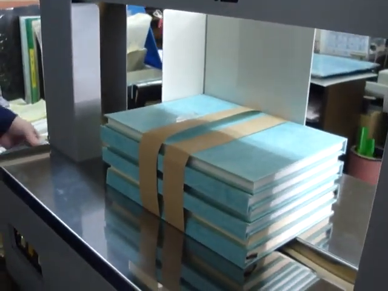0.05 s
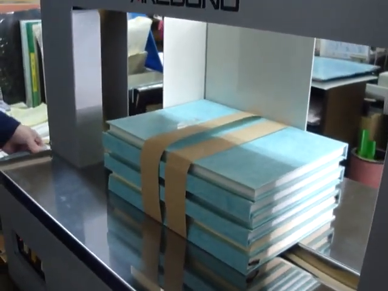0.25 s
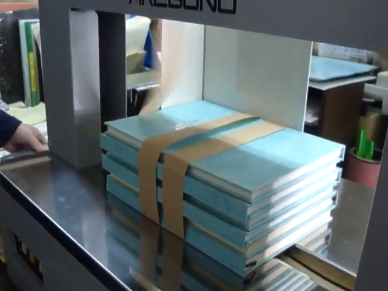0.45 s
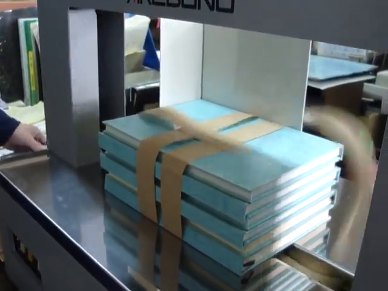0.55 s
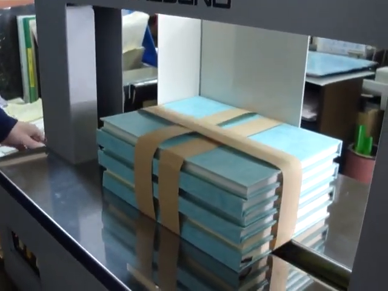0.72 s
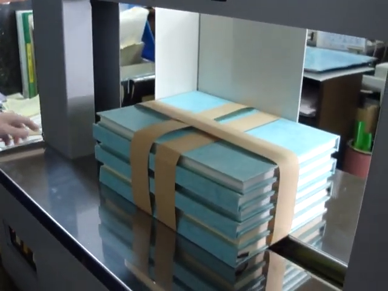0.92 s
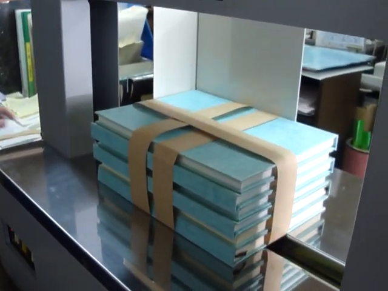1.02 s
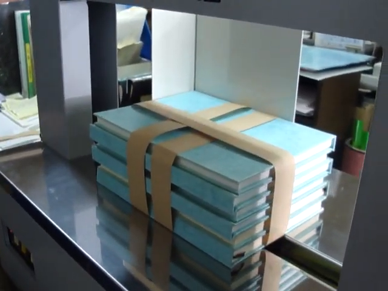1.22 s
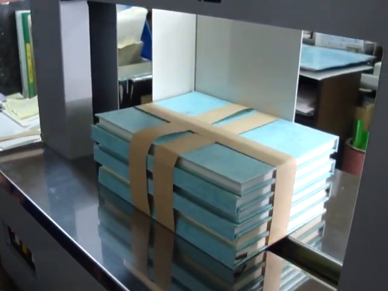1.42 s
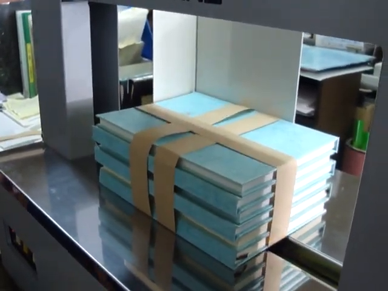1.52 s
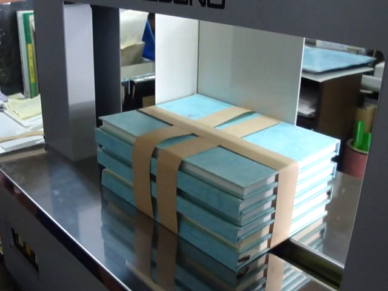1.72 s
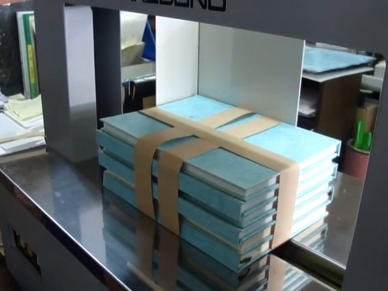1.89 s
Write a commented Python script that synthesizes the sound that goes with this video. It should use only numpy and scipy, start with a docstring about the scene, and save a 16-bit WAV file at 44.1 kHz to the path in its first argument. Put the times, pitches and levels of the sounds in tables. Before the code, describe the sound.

A banding machine runs one cycle in a workshop: low knocks, then paper tape hissing and snapping tight around a stack. After a pause come whirring and sharp steel clacks, heard close over a faint fan and hum.

```python
"""Low knocks, a rush of snaps and hiss, a pause, then whirring and steel clacks over a fan and hum.
A paper banding machine runs one cycle in a workshop. A clamp grips the paper tape and rollers
whip it tight round a stack; then the drive shifts the sealing plate and cutter, and lever blows
ring the steel frame, plate and pawl."""
import sys
import numpy as np
from scipy import signal
from scipy.fft import rfft, irfft
from scipy.io import wavfile

SR = 44100
rng = np.random.default_rng(int(sys.argv[2]) if len(sys.argv) > 2 else 0)


def generate_wav(sig):
    """Save sig (samples, or channels by samples) to the path in sys.argv[1] as 16-bit PCM at SR."""
    pcm = np.round(np.clip(np.atleast_2d(sig).T, -1, 1) * 32767).astype(np.int16)
    wavfile.write(sys.argv[1], SR, pcm)


N = 85995
EDGE_HZ = 11080  # upper band limit
# paper tape spectrum: f/Hz, level/dB
PAPER_SPECTRUM = [(60, -49), (250, -24), (600, -4.5), (1200, -2.5), (2000, -2), (2800, 1), (3700, 4.5),
                  (4500, 3), (5500, 4.5), (6400, 2), (7400, 3.5), (8500, -2), (11000, -6)]


def amp(db):
    """Decibels to gain."""
    return 10 ** (np.asarray(db) / 20)


def unit(x):
    """Scale to rms 1."""
    return x / np.sqrt(np.mean(x ** 2) + 1e-20)


def at_hz(points, hz):
    """Interpolate a table over log frequency."""
    f, value = np.transpose(points)
    return np.interp(np.log(hz + 1), np.log(f + 1), value)


def bump(hz, centre_hz, width_oct):
    """Bell of height 1 over log frequency."""
    return np.exp(-(np.log2((hz + 1) / centre_hz) / width_oct) ** 2)


def gain_curve(points, column=1):
    """Timed dB points to a gain per sample."""
    points = np.array(points)
    return amp(np.interp(np.arange(N) / SR, points[:, 0], points[:, column]))


def add(mix, start_s, sound):
    """Mix a sound in at start_s."""
    part = mix[round(start_s * SR):][:len(sound)]
    part += sound[:len(part)]


def colour(x, shape_db):
    """Filter by a dB function of frequency; rms 1."""
    hz = np.fft.rfftfreq(len(x), 1 / SR)
    return unit(irfft(rfft(x) * amp(shape_db(hz)) * (hz < EDGE_HZ), len(x)))


def drift(rate_hz):
    """Slow random drift, rms 1."""
    return colour(rng.standard_normal(N), lambda hz: -10 * np.log10(1 + (hz / rate_hz) ** 4))


def grains(clicks_per_s=2500, spread_db=2, click_share=0.57):
    """Dense uneven clicks over smooth noise."""
    size = amp(spread_db * np.minimum(rng.exponential(1, N), 4))
    clicks = size * rng.choice([-1, 1], N) * (rng.random(N) < clicks_per_s / SR)
    return np.sqrt(click_share) * unit(clicks) + np.sqrt(1 - click_share) * rng.standard_normal(N)


def burst(envelope, shape_db, size=2048):
    """A flurry of tiny impacts rings a body with the given spectrum."""
    hz = abs(np.fft.fftfreq(size, 1 / SR))
    log_gain = np.log(amp(shape_db(hz)) / (1 + (hz / EDGE_HZ) ** 40) + 1e-4)
    body = np.fft.ifft(np.exp(np.conj(signal.hilbert(log_gain)))).real[:size // 2]  # minimum phase
    impacts = envelope * rng.standard_normal(len(envelope))
    for _ in range(2):
        whitened = irfft(np.exp(1j * np.angle(rfft(impacts))), len(envelope))
        impacts = envelope * np.sign(whitened)
    return signal.fftconvolve(impacts, body / np.linalg.norm(body))[:len(envelope)]


def ring(modes, t):
    """Decaying modes of a steel part, normalised by their summed power."""
    power = sum(amp(db) ** 2 for _, db, _ in modes) / 2
    return sum(amp(db) * np.exp(-np.log(1000) * t / t60_s) * np.sin(2 * np.pi * hz * t)
               for hz, db, t60_s in modes) / np.sqrt(power)


def room(x, early_db=-9, tail_db=-14.5):
    """Early reflections off the steel table and arch, then the workshop's tail."""
    # reverberation: f/Hz, t60/s
    decay_times = [(100, 0.13), (500, 0.77), (2000, 0.83), (5000, 0.54), (8000, 0.23), (11000, 0.27)]
    t = np.arange(SR) / SR
    early = rng.standard_normal(SR) * (rng.random(SR) < 1500 / SR)
    early *= (t > 0.002) * np.exp(-t / 0.0082)
    hz, frame_s, bands = signal.stft(rng.standard_normal(SR), SR, nperseg=256)
    bands *= np.exp(-np.log(1000) * frame_s / at_hz(decay_times, hz)[:, None])
    tail = signal.istft(bands, SR, nperseg=256)[1][:SR] * np.minimum(t / 0.029, 1)
    echo = amp(early_db) * early / np.linalg.norm(early) + amp(tail_db) * tail / np.linalg.norm(tail)
    return signal.fftconvolve(x, echo)[:N]


def fan(flutter_db=0.73):
    """Fan and workshop noise, slightly unsteady."""
    # air noise: f/Hz, level/dB
    spectrum = [(20, -23), (50, -26), (100, -13), (190, -11), (320, -3.5), (450, -9), (590, -3.5),
                (800, -7.5), (1370, -10), (2250, -15.5), (4000, -17), (6200, -18), (9000, -22),
                (11000, -26.5)]
    # swell: t/s, level/dB
    swell = [(0, -62), (.5, -50.5), (1.2, -48), (1.95, -50)]
    air = colour(rng.standard_normal(N), lambda hz: at_hz(spectrum, hz))
    return gain_curve(swell) * air * amp(flutter_db * drift(25))


def hum(wobble=0.00565):
    """Idle hum; each partial wavers in pitch and level."""
    # partials before the swell: f/Hz, level/dB
    partials = [(100, -70.5), (195, -68), (403.7, -57), (590, -56.5), (834, -68.5), (1136, -67),
                (1184, -74.5), (1227, -82.5), (1416, -66.5), (1658, -66.5)]
    # swell: t/s, gain/dB
    swell = [(0, -6), (.7, -0.5), (.95, 3.5), (1.25, 4.5), (1.8, -2.5), (1.95, -1.5)]
    out = np.zeros(N)
    for hz, db in partials:
        phase = 2 * np.pi * np.cumsum(hz * (1 + wobble * drift(14.5))) / SR
        out += amp(db) * unit(np.sin(phase) * (1 + 0.1 * drift(6)))
    return gain_curve(swell) * out


def drive(drone_hz=392, wobble=0.0126, pulse_depth=0.096):
    """Gears rattle in step with the motor while the housing drones."""
    # drive cycle: t/s, rattle/dB, drone/dB
    levels = [(.23, -46, -70), (.26, -37, -82), (.32, -39, -48), (.36, -44, -38), (.38, -22.5, -53),
              (.40, -34, -30), (.45, -31.5, -37.5), (.48, -39.5, -58), (.6, -34.5, -48), (.7, -50, -62),
              (1.0, -50.5, -84), (1.31, -47.5, -70), (1.34, -27, -47), (1.38, -30, -47),
              (1.405, -29.5, -25), (1.44, -32.5, -42.5), (1.455, -26.5, -27.5), (1.477, -25, -19.5),
              (1.495, -35.5, -28), (1.52, -40, -41), (1.56, -34.5, -64), (1.7, -51, -75), (1.8, -72, -68)]
    # gear rattle: f/Hz, level/dB
    gear_spectrum = [(50, -49), (130, -17), (185, 3.5), (270, -5), (450, -0.5), (600, 4.5), (850, 2),
                     (1050, 2.5), (1230, 5), (1600, -4.5), (3200, -11), (6000, -12), (11000, -23.5)]
    phase = 2 * np.pi * np.cumsum(drone_hz * (1 + wobble * drift(40))) / SR
    drone = np.sin(phase) + amp(-22.5) * np.sin(phase / 2) + amp(-17.5) * np.sin(1.5 * phase)
    pulsing = 1 + pulse_depth * np.cos(phase / 2)
    rattle = colour(grains() * pulsing, lambda hz: at_hz(gear_spectrum, hz))
    return gain_curve(levels, column=1) * rattle + gain_curve(levels, column=2) * unit(drone)


def knocks(push_s=0.00014, swing_hz=239, decay_s=0.0068):
    """Each short push sets off a low, damped swing of the table."""
    # knocks at cycle start: t/s, level/dB
    hits = [(.1430, -25), (0.1524, -23.5), (0.1744, -22.5)]
    out, t = np.zeros(N), np.arange(SR // 20) / SR
    push = -np.exp(-((t - push_s) / push_s) ** 2)
    swing = np.cos(2 * np.pi * swing_hz * (t - 0.001)) * np.exp(-t / decay_s) * (t > 2 * push_s)
    for start_s, db in hits:
        add(out, start_s, amp(db) * (push + 0.41 * swing))
    return out


def lever_clacks(ring_rise_s=0.0015, low_cut_db_per_oct=4.5):
    """Each blow cracks above the part's lowest resonance and rings frame, plate and pawl."""
    # lever blows: t/s, crack/dB, lowest resonance/Hz, its lift/dB, attack/s, decay/s,
    # frame/dB, plate/dB, pawl/dB, contact damping/(1/s, sign ignored)
    blows = [(.196, -44, 3100, 11, .001, 0.024, -58, -57, -60, 20),
             (.229, -19, 3100, 7, 0.0011, 0.0044, -41, -45, -40, 60),
             (0.2361, -21.5, 810, 15, 0.0017, .005, -48, -53, -38, 10),
             (0.2461, -21, 1300, 10, 0.0017, 0.0096, -25, -53, -11.5, 45),
             (1.076, -40, 3540, -9, .001, 0.003, -70, -72.5, -70, 20),
             (1.2863, -22.5, 1380, 9.5, 0.0053, 0.01, -19.5, -45, -50, 15),
             (1.331, -15.5, 1190, 8, .003, 0.015, -21.5, -47, -22, 6),
             (1.3402, -20.5, 600, 14, 0.00069, 0.0082, -23.5, -31, -44, 25),
             (1.342, -23.5, 3150, 28, .001, .02, -47, -43, -50, 23),
             (1.3846, -26.5, 4470, 8, 0.0011, 0.016, -48, -48, -45, 20),
             (1.427, -20.5, 4480, 0.5, 0.0037, 0.0065, -32, -58, -28, 13),
             (1.549, -12.5, 1360, 8.5, 0.00034, .007, -22.5, -39, -43, -2),
             (1.5496, -15.5, 2170, 17.5, .0006, 0.011, -50, -51, -57, 5),
             (1.5742, -18.5, 3320, 10.5, 0.00038, 0.0036, -38, -23, -51, 110),
             (1.602, -27.5, 1430, 2, 0.00066, 0.017, -56, -36, -49, 40),
             (1.625, -13.5, 6050, 5, 0.0017, .005, -28.5, -20, -42.5, 8)]
    # crack spectrum: f/Hz, level/dB
    spectrum = [(40, -7), (200, 0.5), (500, 2), (1300, 3.5), (2300, 1.5), (2900, 1), (4200, 1.5),
                (6500, 3.5), (8300, -1), (11000, -9)]
    # steel modes: f/Hz, level/dB, t60/s
    frame_modes = [(1203, 1.5, 0.14), (1279, -8.5, 0.17), (1388, -7.5, 0.21), (1900, -27, .08),
                   (2320, -31, 0.043), (2370, 1, 0.16), (3463, 0.5, .08), (4538, 6, 0.096),
                   (5600, -1, 0.079), (5790, -1.5, 0.23), (6890, -23, 0.07), (8100, -0.5, 0.052),
                   (9210, -6.5, 0.08)]
    plate_modes = [(3060, -2, 0.066), (3530, 7.5, 0.09), (3528, -6, 0.4), (3540, -7.5, 0.58),
                   (3597, 2, 0.12), (5884, -6, .18), (7370, -8, 0.17)]
    pawl_modes = [(4370, -2, .05), (4605, 2, 0.11), (4400, 7.5, .05), (5640, -6, 0.091)]
    cracks, rings, t = np.zeros(N), np.zeros(N), np.arange(SR // 2) / SR
    frame, plate, pawl = ring(frame_modes, t), ring(plate_modes, t), ring(pawl_modes, t)
    for start_s, db, low_hz, lift_db, attack_s, decay_s, frame_db, plate_db, pawl_db, damping in blows:
        def crack_db(hz):
            resonance_db = lift_db * bump(hz, low_hz, width_oct=0.3)
            below_oct = np.clip(np.log2(low_hz / (hz + 1)), 0, 3)
            return at_hz(spectrum, hz) + resonance_db - low_cut_db_per_oct * below_oct

        envelope = np.minimum(t / attack_s, 1) * np.exp(-np.maximum(t - attack_s, 0) / decay_s)
        add(cracks, start_s, amp(db) * burst(envelope, crack_db))
        steel = amp(frame_db) * frame + amp(plate_db) * plate + amp(pawl_db) * pawl
        add(rings, start_s, steel * np.minimum(t / ring_rise_s, 1) * np.exp(-abs(damping) * t))
    return cracks, rings


def tape_hiss(treble_hz=7560):
    """Tape slides through its guide, brighter as it runs faster."""
    # sliding: t/s, level/dB
    slide = [(.32, -56), (.335, -34), (.355, -26), (.366, -25), (.42, -25), (.44, -24), (.474, -28),
             (.481, -45), (.496, -29.5), (.505, -24), (.56, -28), (.60, -26.5), (.625, -30), (.643, -22.5),
             (.66, -32.5), (.688, -26), (.696, -59), (.76, -38.5), (.82, -48.5), (.86, -43), (.89, -65)]
    # brightness: t/s, (1 + net treble gain)/dB
    brightness = [(.35, -3), (.45, 1.5), (.49, 4.5), (.54, 8), (.64, 9), (.68, 5.5), (.72, 3.5)]
    hiss = colour(grains(), lambda hz: at_hz(PAPER_SPECTRUM, hz))
    high_pass = 1 - 1 / (1 + (np.fft.rfftfreq(N, 1 / SR) / treble_hz) ** 10)
    treble = irfft(rfft(hiss) * high_pass, N)
    treble_gain = gain_curve(brightness) - 1
    return gain_curve(slide) * (hiss - treble + treble_gain * treble)


def tape_snaps(release_s=0.00032, thud_hz=81.5, thud_rise_s=0.0016, thud_decay_s=0.0046):
    """Tape snaps free of the arch and slaps the stack with a low thud."""
    # snaps: t/s, level/dB, centre/Hz, decay/s, slap lift/dB, thud/dB
    snaps = [(0.3361, -12.5, 5400, 0.0034, 7.5, -36), (0.3582, -8, 5750, 0.0017, 4.5, -55),
             (0.3606, -17, 3380, 0.0068, 10, -63), (.3788, -13, 4230, 0.0019, -8, -57),
             (0.3932, -17, 6650, 0.0082, -10, -60), (0.4262, -8, 5100, 0.0019, 4.5, -55),
             (0.4313, -15, 5800, 0.0034, 4, -76), (0.4478, -16.5, 5740, 0.0037, -10, -55),
             (.465, -16, 7700, 0.0032, 4, -53), (0.4711, -6.5, 5700, .0014, -20, -58),
             (0.5031, -12.5, 5450, 0.0028, 2, -63), (.511, -20.5, 3580, 0.0062, 8, -69),
             (0.525, -19, 7200, .004, -11, -65), (0.574, -22, 5500, 0.011, -9, -65),
             (0.605, -19.5, 5600, 0.0049, 8, -65), (0.632, -28, 7400, 0.011, -3, -41),
             (0.6639, -5.5, 5250, 0.0017, -22, -43), (0.6808, -13, 5860, 0.0028, -23, -66),
             (0.6858, -18, 7600, 0.0026, -8, -65)]
    out, t = np.zeros(N), np.arange(SR // 10) / SR
    thud = np.sin(2 * np.pi * thud_hz * t) * np.exp(-t / thud_decay_s) * np.minimum(t / thud_rise_s, 1)
    for start_s, db, centre_hz, decay_s, slap_lift_db, thud_db in snaps:
        def snap_db(hz):
            peak_db = 8.5 * bump(hz, centre_hz, width_oct=0.26)
            slap_db = slap_lift_db * bump(hz, centre_hz=1500, width_oct=1.05)
            return at_hz(PAPER_SPECTRUM, hz) + peak_db + slap_db

        envelope = np.minimum(t / release_s, 1) * np.exp(-t / decay_s)
        add(out, start_s, amp(db) * burst(envelope, snap_db) + amp(thud_db) * thud)
    return out


def scene():
    """One machine cycle, mono; the steel rings stay mostly dry and clear."""
    cracks, rings = lever_clacks()
    knocks_cracks_and_tape = knocks() + cracks + tape_hiss() + tape_snaps()
    reflections = room(knocks_cracks_and_tape + 0.35 * rings)
    return (knocks_cracks_and_tape + rings + reflections + drive() + hum() + fan())[None]


def record(dry):
    """Low-pass at the band limit."""
    low_pass = signal.firwin(401, EDGE_HZ, window=("kaiser", 8), fs=SR)
    return signal.oaconvolve(dry, low_pass[None], "same")


dry = scene()
out = record(dry)
generate_wav(out)
```